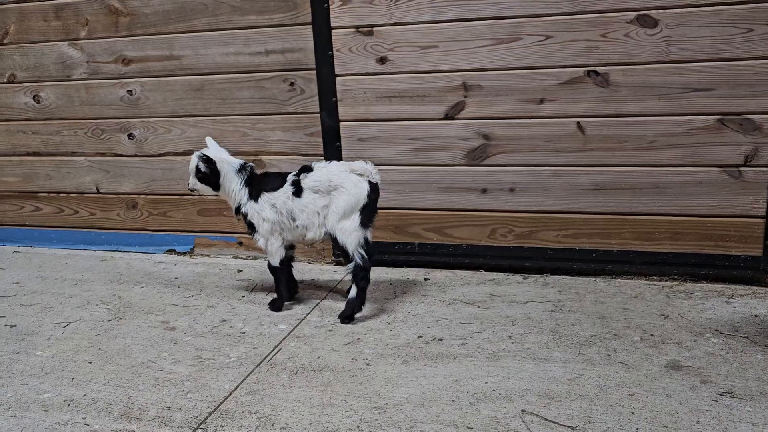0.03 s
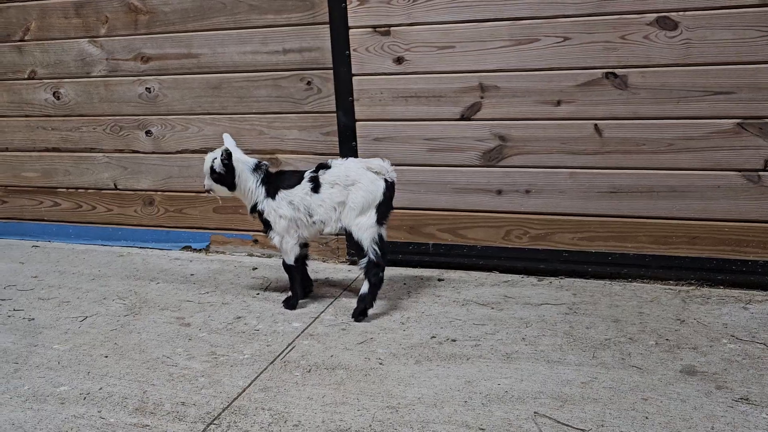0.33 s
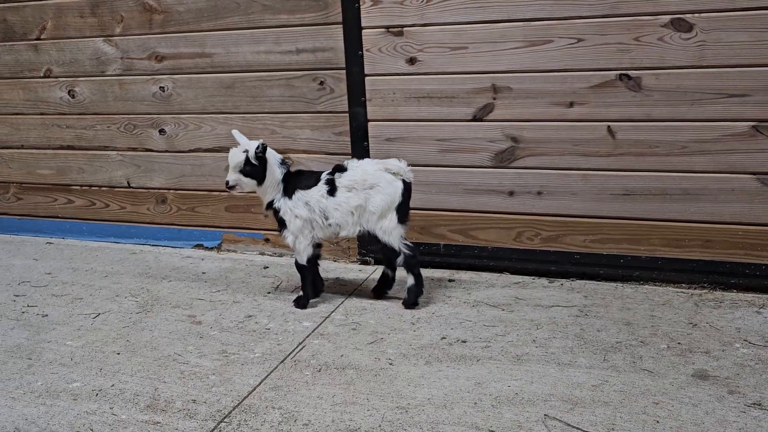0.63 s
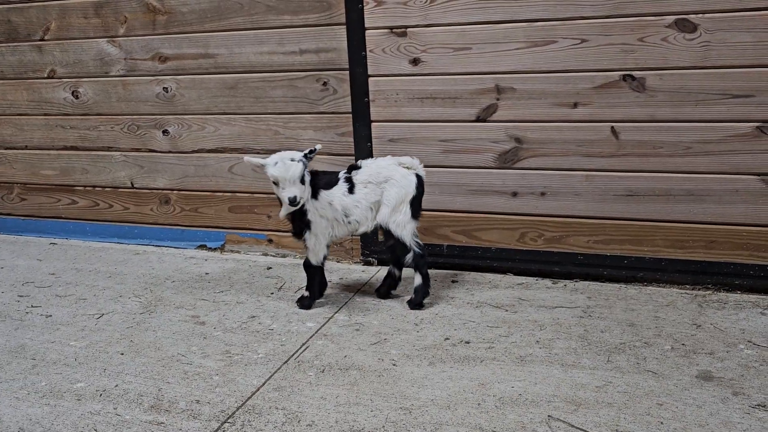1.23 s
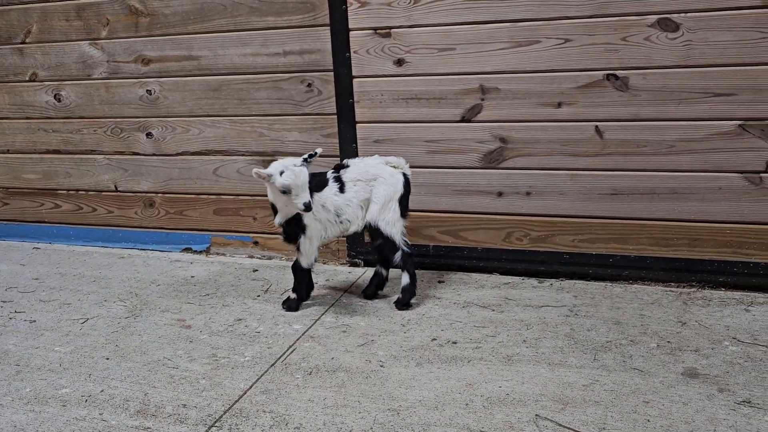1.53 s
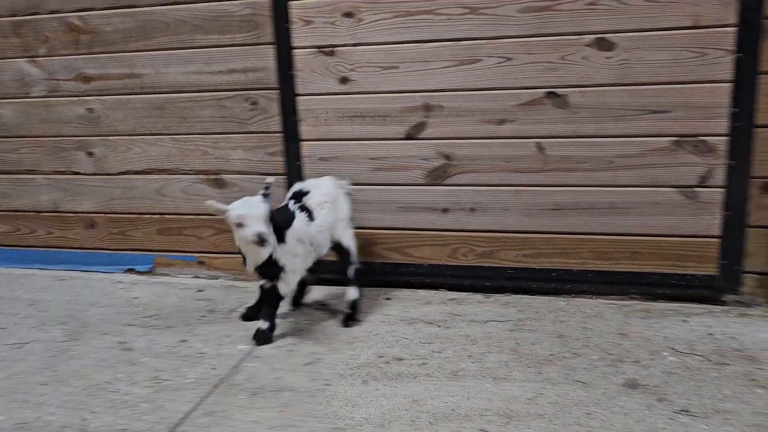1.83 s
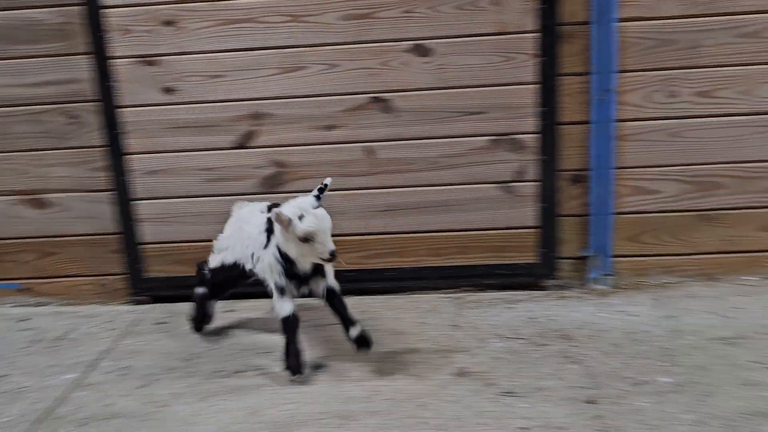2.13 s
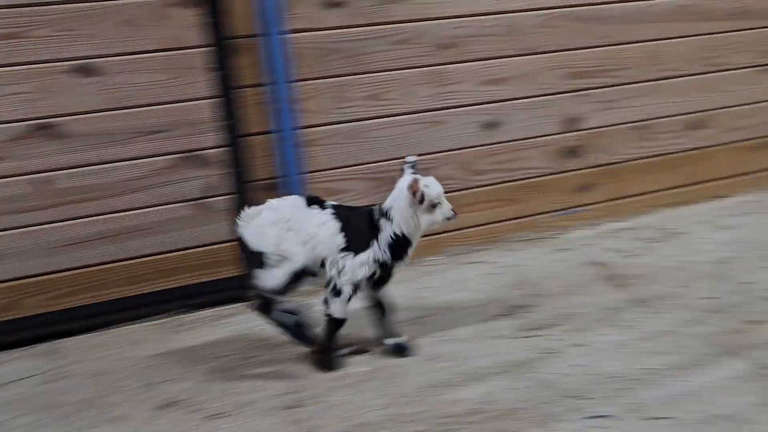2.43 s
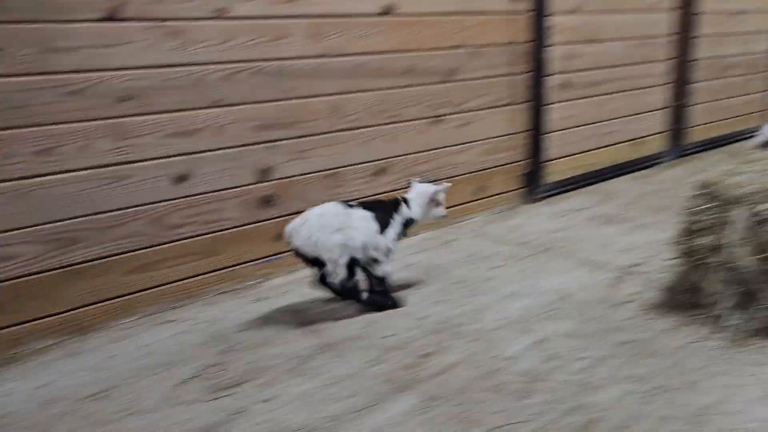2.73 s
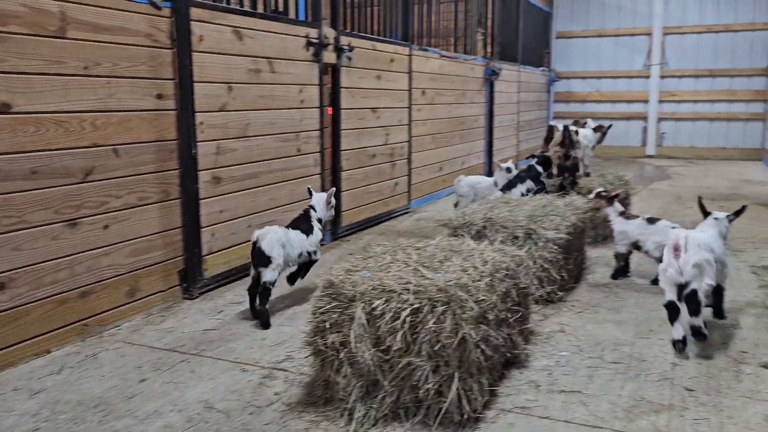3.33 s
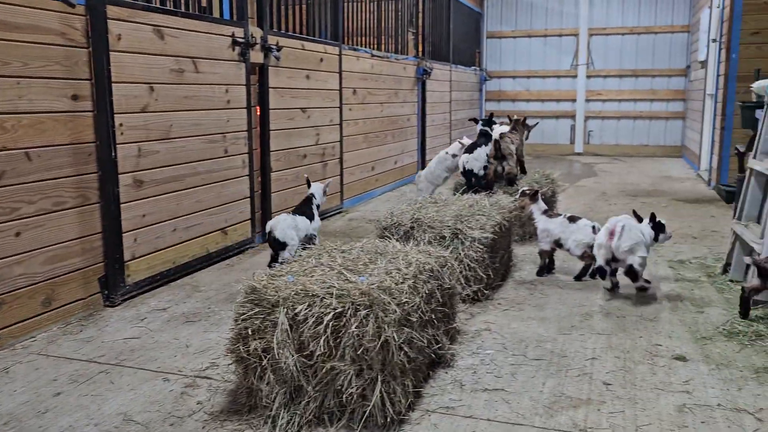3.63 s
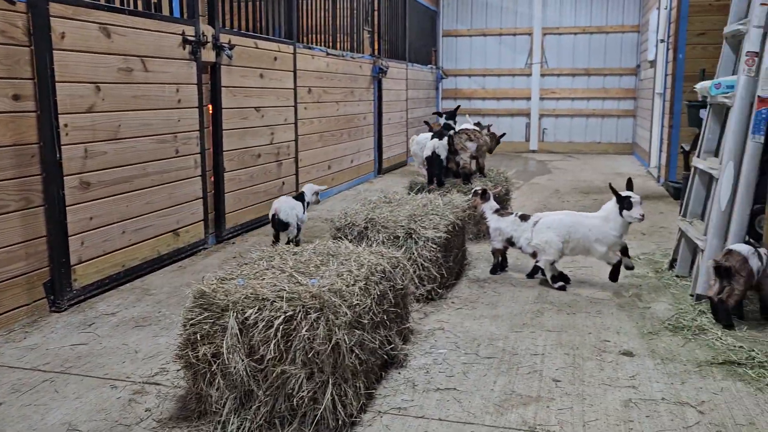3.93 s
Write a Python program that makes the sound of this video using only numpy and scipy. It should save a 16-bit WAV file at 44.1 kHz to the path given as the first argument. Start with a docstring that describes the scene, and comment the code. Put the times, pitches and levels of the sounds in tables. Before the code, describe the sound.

A goat kid's hooves tap lightly on a concrete barn floor, first in scattered steps, then in a quick scamper. Clothing swishes close to the softly rumbling hand-held microphone, and other kids make dull bumps further off.

```python
"""A goat kid shifts its hooves on the concrete floor of a quiet barn, then scampers off to the herd.
Each hoof makes a woody tap and a hard click, two tiny bursts of noise that echo off the stalls.
Clothing swishes close to a hand-held camera, which rumbles softly as it turns. Both are shaped
noise, as is a gritty scuffing. Other kids bump about further off, each bump a cluster of
fast-fading tones, over still air and a low hum."""
import sys
import numpy as np
from scipy import signal
from scipy.fft import rfft, irfft
from scipy.io import wavfile
from scipy.ndimage import uniform_filter1d

SR = 44100
rng = np.random.default_rng(int(sys.argv[2]) if len(sys.argv) > 2 else 0)


def waveform_to_disk(signal):
    """Save audio, clipped to [-1, 1], as 16-bit WAV at the path in sys.argv[1]."""
    frames = np.transpose(np.atleast_2d(signal))
    scaled = np.clip(frames, -1, 1) * 32767
    samples = np.round(scaled).astype(np.int16)
    wavfile.write(sys.argv[1], SR, samples)


N = 176400  # 4 seconds
T = np.arange(N) / SR


def amp(db):
    """Turns decibels (dB) into a number to multiply a sound by."""
    return 10 ** (np.asarray(db) / 20)


def unit(x):
    """Scales a signal so that its average strength (rms) is 1."""
    return x / np.sqrt(np.mean(x ** 2) + 1e-20)


def at_pitch(table, hz):
    """Looks up a table by frequency, sliding between rows on a musical (log) scale."""
    freqs, values = np.transpose(table)
    return np.interp(np.log(hz + 1), np.log(freqs + 1), values)


def over_time(table):
    """Joins a table's timed values with straight lines."""
    return np.interp(T, *np.transpose(table))


def panned(db):
    """Left and right gains for a pan: how many dB louder the left side is."""
    return amp(np.array([[.5], [-.5]]) * db)


def drift(hz):
    """A smooth random wobble, mostly slower than hz."""
    freqs = np.fft.rfftfreq(N, 1 / SR)
    return unit(irfft(rfft(rng.standard_normal(N)) * np.exp(-(freqs / hz) ** 2), N))


def hit(start, rise_s, decay_s):
    """The loudness shape of a hit: it rises quickly, then dies away."""
    t = np.maximum(T - start, 0)
    return np.minimum(t / rise_s, 1) * np.exp(-np.clip((t - rise_s) / decay_s, 0, 50))


# How alike left and right sound. Each row: frequency in Hz, likeness from 0 to 1.
STEREO_LIKENESS = [(60,.995),(170,.975),(300,.92),(480,.8),(690,.6),(1000,.15),(1500,0),(2050,.65),(2800,0),(15000,0)]

def noise(colour, patch_db=0, grain_db=0):
    """Stereo noise shaped by colour (dB at each frequency); grain roughens it, patches make it flicker."""
    grains = amp(grain_db * np.minimum(rng.exponential(1, N), 6))
    hz, _, bands = signal.stft(rng.standard_normal((2, N)) * grains, SR, nperseg=2048, noverlap=1536)
    alike = np.clip(at_pitch(STEREO_LIKENESS, hz), 0, 1)[:, None]
    bands[1] = alike * bands[0] + np.sqrt(1 - alike ** 2) * bands[1]
    patches = uniform_filter1d(rng.standard_normal(bands.shape[1:]), size=12, axis=0)
    patches = unit(uniform_filter1d(patches, size=6, axis=1))
    hiss = signal.istft(bands * amp(patch_db * patches), nperseg=2048, noverlap=1536)[1][:, :N]
    return unit(irfft(rfft(hiss) * amp(colour(np.fft.rfftfreq(N, 1 / SR))), N))


# The tone of the still air. Each row: frequency in Hz, relative level in dB.
AIR_COLOUR = [(15,-43),(28,-8),(45,4.5),(62,1),(95,-3),(158,-2.5),(284,-9),(365,-18.5),(510,-18.5),(700,-32.5),(1050,-28),(1500,-24),(2050,-34),(2600,-33),(4600,-25.5),(5800,-30),(7900,-31),(10100,-45),(11600,-30.5),(13000,-40),(15800,-34)]
# Low hums. Each row: pitch in Hz, how far it wanders in Hz, a list of (seconds, level in dB).
HUMS = [(83.2,4.93,[(0,-67),(.8,-52),(1.2,-57),(1.6,-56),(2.1,-52),(2.7,-61),(3.3,-66),(4,-62)]),(116.15,6.19,[(0,-58),(.8,-56),(1.2,-58.5),(1.8,-62),(2.5,-63),(4,-64.5)]),(282,18,[(0,-66.5),(1,-63),(2,-68),(4,-68.5)])]

def room_tone():
    """Still air, with low hums that waver in loudness and pitch."""
    hum = np.zeros(N)
    for hz, wander_hz, levels in HUMS:
        loudness = amp(over_time(levels)) * (1 + 0.3 * drift(5.8))
        phase = 2 * np.pi * np.cumsum(hz + wander_hz * drift(8.63)) / SR
        hum += loudness * np.sqrt(2) * np.sin(phase)
    return hum + amp(-54.5) * noise(lambda f: at_pitch(AIR_COLOUR, f), patch_db=2.03)


# The tone of the camera's rumble. Each row: frequency in Hz, relative level in dB.
RUMBLE_COLOUR = [(15,-58),(27,-35),(40,-5),(60,-2.5),(90,2.5),(135,-17),(170,-8),(240,-7),(370,-22.5),(500,-13),(800,-33.5),(1500,-65),(4000,-82)]
# How the rumble swells and sinks. Each row: time in seconds, level in dB.
RUMBLE_LEVELS = [(0,-51.5),(.5,-55.5),(1.1,-60),(1.5,-63),(1.9,-54.5),(2.15,-52.5),(2.6,-49.5),(3.08,-52.5),(3.15,-61),(3.45,-58),(3.65,-53.5),(4,-55.5)]
# Soft thumps of the hand on the camera. Each row: start in seconds, level in dB.
THUMPS = [(.005,-41),(.358,-35.5),(0.402,-40.5),(0.613,-40),(1.67,-39.5),(1.832,-43),(2.18,-37.5),(2.353,-45),(2.42,-43),(2.552,-64),(2.633,-39),(2.981,-37),(3.1,-40)]

def camera_handling():
    """The moving camera rumbles, with short low thumps at slightly different pitches."""
    sound = amp(over_time(RUMBLE_LEVELS)) * noise(lambda f: at_pitch(RUMBLE_COLOUR, f), patch_db=2)
    pitches_hz = 76.2 * rng.normal(1, 0.1, len(THUMPS))
    for (start, db), hz in zip(THUMPS, pitches_hz):
        tone = np.sin(2 * np.pi * hz * (T - start))
        sound += amp(db) * hit(start, rise_s=0.007, decay_s=0.023) * tone
    return sound


# Swishes of clothing. Each row: start, length and rise time, all in seconds, then level in dB.
SWISHES = [(0,0.25,0.0039,-62),(0.194,0.19,0.042,-58.5),(0.322,0.15,0.09,-57),(0.472,0.25,0.032,-62.5),(0.683,0.3,.04,-68),(0.826,0.13,0.02,-59.5),(0.972,0.063,0.045,-64.5),(1.181,0.26,0.063,-55.5),(1.467,0.18,0.091,-57),(1.623,0.13,0.071,-63),(1.823,0.1,0.012,-56.5),(1.912,0.13,0.028,-60.5),(1.95,0.44,0.16,-50),(2.357,0.16,0.026,-50.5),(2.48,0.32,0.071,-53.5),(2.74,0.28,0.017,-51.5),(2.886,0.12,0.047,-55),(3.047,0.2,0.063,-62),(3.317,0.094,0.02,-56.5),(3.398,0.16,0.07,-55.5),(3.572,0.16,.02,-58.5),(3.677,0.97,0.12,-65)]
# Small ticks in the cloth. Each row: start in seconds, level in dB.
TICKS = [(.095,-54.5),(0.335,-54),(.610,-56.5),(1.932,-66),(2.377,-64),(2.753,-48.5),(2.80,-56),(3.047,-67),(3.179,-57),(3.488,-54),(3.587,-61)]
# The tone of a swish (low and high parts) and a tick. Each row: frequency in Hz, relative level in dB.
SWISH_LOWS = [(100,-46),(600,-2.5),(1500,-12)]
SWISH_HIGHS = [(1470, -55), (2500, -6.5), (2740, -5), (2990, -4), (3250, -6.5), (4030, -1), (4560, 0),
               (6820, -4), (8080, -1), (10300, -8), (11600, 1.5), (13200, -5), (15100, -1), (15800, -1)]
TICK_COLOUR = [(500,-33),(2000,-5),(5000,2),(10000,-4),(12500,3.5),(15800,-1.5)]
# Which side the cloth is on. Each row: time in seconds, pan in dB (above 0 is left).
CLOTH_PAN = [(0,.5),(1.3,-2),(2.2,1.5),(2.8,1.5),(3.3,2),(4,6)]

def cloth():
    """Fibres slip in swishes that swell and fade; now and then one catches with a tick."""
    fall_db = -10  # how far a swish has faded at the end of its length
    power = np.zeros(N)
    for start, length, rise, db in SWISHES:
        t = np.maximum(T - start, 0)
        swell = np.sin(np.pi / 2 * np.minimum(t / rise, 1))
        fade = np.minimum(np.maximum(t - rise, 0) / max(length - rise, .01), 3)
        power += (swell * amp(db + fall_db * fade ** 2)) ** 2
    fibres = noise(lambda f: at_pitch(SWISH_LOWS + SWISH_HIGHS, f), patch_db=2.26, grain_db=2.5)
    catches = sum(amp(db) * hit(start, rise_s=0.003, decay_s=0.013) for start, db in TICKS)
    ticks = catches * noise(lambda f: at_pitch(TICK_COLOUR, f))
    swishes = fibres * np.sqrt(power) * amp(0.5 * drift(65))
    return (swishes + ticks) * panned(over_time(CLOTH_PAN))


def resonance(hz, centre, width):
    """A steep peak, in dB, that keeps only the frequencies near its centre."""
    return -20 * np.log10(1 + ((hz - centre) / width) ** 2)


# The tone of the scuffing. Each row: frequency in Hz, relative level in dB.
SCUFF_COLOUR = [(200,2),(380,1),(500,2),(750,0.5),(1100,-5.5),(1400,-6),(1800,-3),(2500,-9),(3500,-7.5),(8000,-19)]
# Pitches that the scuffing sets ringing. Each row: pitch in Hz, width in Hz, relative level in dB.
RINGS = [(500,47,-5),(1370,170,-6),(2049,166,-1.5)]
# How loud the scuffing and its ringing are. Each row: time in seconds, level in dB.
SCUFF_LEVELS = [(0,-57),(.28,-71.5),(.4,-59.5),(.55,-73.5),(.83,-63.5),(1.05,-75.5),(1.2,-62.5),(1.7,-67.5),(1.95,-62),(2.13,-58),(2.35,-69),(2.55,-61),(2.7,-58.5),(3.12,-57),(3.3,-63),(3.47,-62.5),(3.57,-53.5),(3.66,-61),(3.76,-71),(3.9,-62),(4,-68)]
RING_LEVELS = [(0,-71),(.07,-62.5),(.15,-71),(.23,-69),(.3,-68.5),(.36,-71),(.47,-73.5),(1.05,-78.5),(1.2,-69),(1.36,-74.5),(1.52,-69.5),(1.68,-77.5),(1.95,-71.5),(2.09,-64),(2.2,-63.5),(2.33,-69),(2.45,-69.5),(2.55,-71),(2.72,-60),(2.85,-60),(2.98,-60.5),(3.1,-58.5),(3.16,-61.5),(3.3,-79),(3.48,-76),(3.56,-63.5),(3.65,-58),(3.72,-74),(3.8,-72),(3.88,-67),(4,-77)]

def scuffing():
    """Gritty scuffing and rustling, with a fluttering ring made of narrow bands of noise."""
    grit = noise(lambda f: at_pitch(SCUFF_COLOUR, f), patch_db=2.0, grain_db=3.0)
    grit *= amp(1.5 * drift(33))
    ring = sum(amp(db) * noise(lambda f: resonance(f, hz, width)) for hz, width, db in RINGS)
    return amp(over_time(SCUFF_LEVELS)) * grit + amp(over_time(RING_LEVELS)) * ring


# Hoof falls. Each row: start in seconds, tap level in dB, click level in dB, pan in dB.
HOOF_FALLS = [(.003,-54,-49,-1),(.037,-53.5,-57,1),(.330,-45.5,-51.5,-2),(.334,-49,-52,-2),(0.35,-48,-51,2),(.356,-50.5,-58,-6),(0.382,-57,-56,-2),(0.404,-52.5,-54,4),(.427,-49,-64,-4),(0.611,-54,-66,7),(0.627,-52,-73,1),(.662,-53,-50,-2),(1.090,-59,-76,4),(1.155,-52,-64,2),(1.184,-53.5,-70,-2),(1.664,-68,-58,-1),(1.772,-55,-71,-1),(1.933,-56.5,-55,10),(2.074,-48,-65,5),(2.099,-50.5,-44.5,-1),(2.180,-48,-52,-2),(2.209,-50.5,-56,-4),(2.261,-52.5,-57,-1),(2.425,-46,-55,-3),(2.453,-53,-51.5,-7),(2.513,-61,-71,-5),(2.632,-48.5,-55,2),(2.647,-52,-52.5,-2),(2.654,-49.5,-58,-6),(2.686,-45.5,-49,-4),(3.055,-49,-49,-3),(3.064,-46.5,-52,3),(3.092,-47,-69,0),(3.161,-50,-53,4),(3.179,-64,-57,-3),(3.594,-55,-48.5,-3),(3.612,-57,-51,8)]
# The tone of a tap and of a click. Each row: frequency in Hz, relative level in dB.
TAP_COLOUR = [(80,-26),(250,9.5),(380,2.5),(550,-3),(800,1),(1100,-3),(1700,-0.5),(2300,-7.5),(2800,-10.5),(4300,-30),(6500,-23),(15000,-34)]
CLICK_COLOUR = [(600,-40),(1800,-14.5),(3200,-4.5),(4600,-3.5),(5400,-2),(6500,-12.5),(9000,-12),(15000,-18)]

def hooves():
    """Each hoof gives a woody tap and a hard click of its rim on concrete; the stalls echo both."""
    taps, clicks = np.zeros((2, N)), np.zeros((2, N))
    for start, tap_db, click_db, pan in HOOF_FALLS:
        taps += amp(tap_db) * panned(pan) * hit(start, rise_s=0.001, decay_s=0.004)
        clicks += amp(click_db) * panned(pan) * hit(start, rise_s=0.00076, decay_s=0.0023)
    taps *= noise(lambda f: at_pitch(TAP_COLOUR, f), patch_db=3.0)
    clicks *= noise(lambda f: at_pitch(CLICK_COLOUR, f), patch_db=4.0)
    steps = taps + clicks
    return steps + amp(-1) * barn_echo(steps)


# How long the barn echoes. Each row: frequency in Hz, seconds taken to fade by 60 dB.
ECHO_TIMES = [(100,0.17),(500,0.58),(2000,0.27),(6000,0.68),(15000,0.41)]

def barn_echo(sound):
    """The wooden stalls scatter a sound into a smooth, fading tail."""
    hz, t, bands = signal.stft(rng.standard_normal((2, SR // 2)), SR, nperseg=256)
    fade = amp(-60 * t / at_pitch(ECHO_TIMES, hz)[:, None])
    tail = signal.istft(bands * fade, nperseg=256)[1]
    tail *= np.minimum(np.arange(tail.shape[1]) / SR / 0.004, 1)  # builds up over 4 ms
    return signal.fftconvolve(sound, tail / np.linalg.norm(tail[0]), axes=1)[:, :N]


# Hollow bumps further off. Each row: start in seconds, level in dB, middle pitch in Hz.
BUMPS = [(.330,-56,560),(.354,-57,573),(.403,-42.5,142),(0.613,-59.5,485),(0.644,-53.5,488),(.70,-67,490),(1.165,-58.5,526),(1.275,-61,554),(1.335,-50,283),(1.340,-52,491),(1.367,-58,490),(1.445,-56,528),(1.485,-58.5,565),(1.539,-62.5,532),(1.93,-58.5,570),(2.07,-49,270),(2.281,-53,242),(2.447,-53,531),(2.458,-43.5,242),(2.517,-50.5,245),(2.666,-43.5,203),(3.06,-49,547),(3.185,-53,574),(3.588,-54,499),(3.65,-63,196),(3.77,-53,201),(3.811,-53.5,195),(3.859,-55,500)]

def herd_bumps():
    """Other kids bump about: each dull, hollow knock is eleven close tones that die quickly."""
    bumps = np.zeros((2, N))
    spread = 0.349  # tones reach about this share of the middle pitch above and below it
    offsets = np.arange(-5, 6) / 5
    weights = np.exp(-offsets ** 2)  # the middle tones are loudest
    for start, db, hz in BUMPS:
        jitter, phases = rng.random((2, len(offsets)))
        t = np.maximum(T - start, 0)
        ringing = (t > 0) & (t < .2)
        pitches = hz * (1 + spread * (offsets + 0.18 * (jitter - .5)))
        tones = np.sin(2 * np.pi * (pitches[:, None] * t[ringing] + phases[:, None]))
        loudness = amp(db) * hit(start, rise_s=0.0064, decay_s=0.021)
        bumps[:, ringing] += loudness[ringing] * unit(weights @ tones)
    return bumps + amp(-4) * barn_echo(bumps)


def scene():
    """Everything heard in the barn, added together."""
    return room_tone() + camera_handling() + cloth() + scuffing() + hooves() + herd_bumps()


# The balance of the two microphones. Each row: frequency in Hz, how many dB louder the left one is.
MIC_BALANCE = [(60,2),(170,1.6),(300,2.5),(480,1.5),(750,-0.2),(1400,1.5),(2100,1),(2600,-1),(3100,-5),(3600,-5.5),(4200,-5),(4800,-8),(5400,5),(6000,1),(6800,4.5),(7800,4.5),(9000,7),(9700,8),(10400,3.5),(11500,-6.5),(12500,5.5),(14200,2.5),(15600,-4)]

def record(dry):
    """Each microphone colours the sound in its own way; then the highest treble is cut off."""
    hz = np.fft.rfftfreq(N, 1 / SR)
    coloured = irfft(rfft(dry) * panned(at_pitch(MIC_BALANCE, hz)), N)
    treble_cut = signal.firwin(511, cutoff=15900, window=("kaiser", 9), fs=SR)
    return signal.oaconvolve(coloured, treble_cut[None], "same")


dry = scene()
out = record(dry)
waveform_to_disk(out)
```